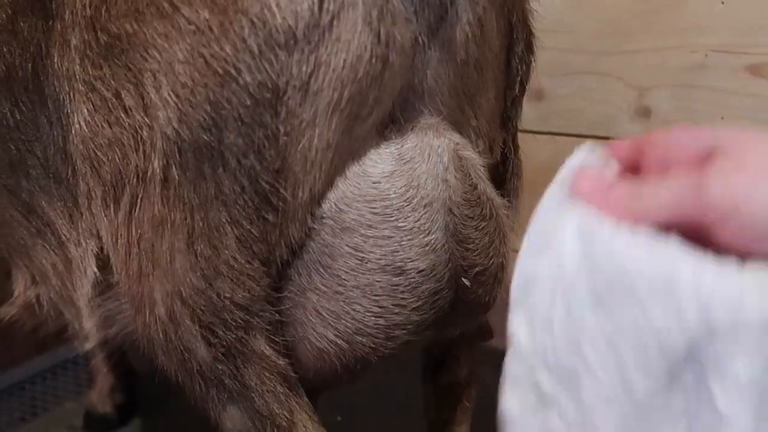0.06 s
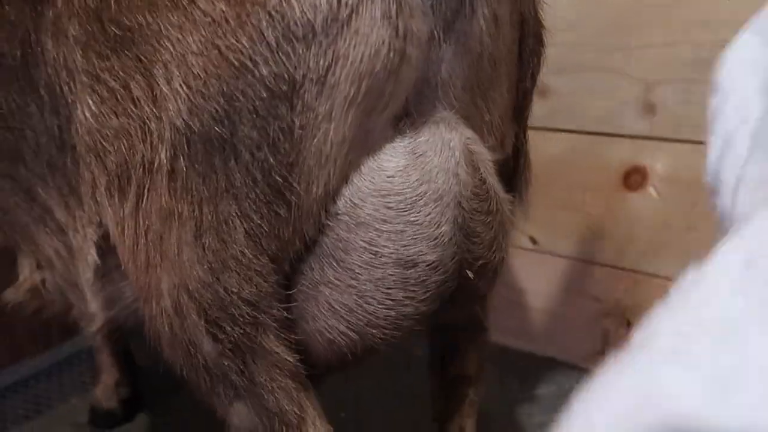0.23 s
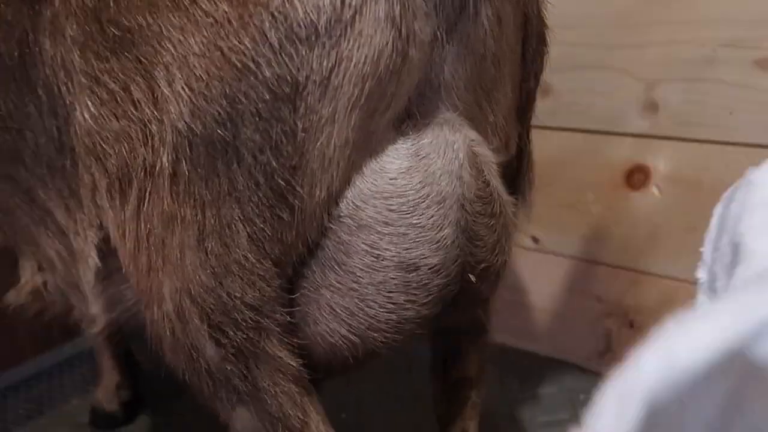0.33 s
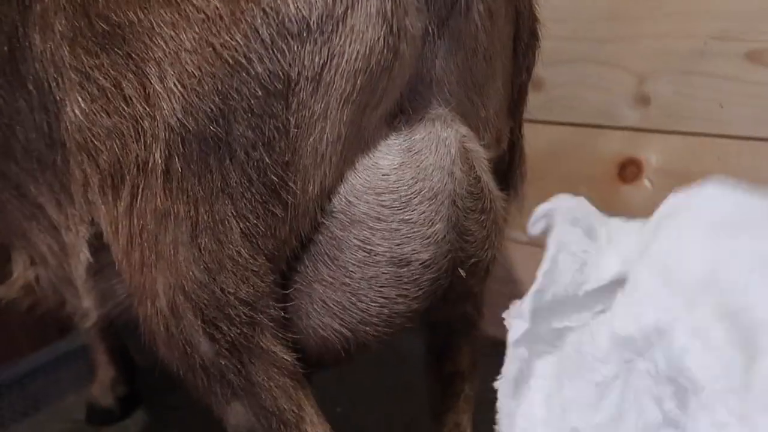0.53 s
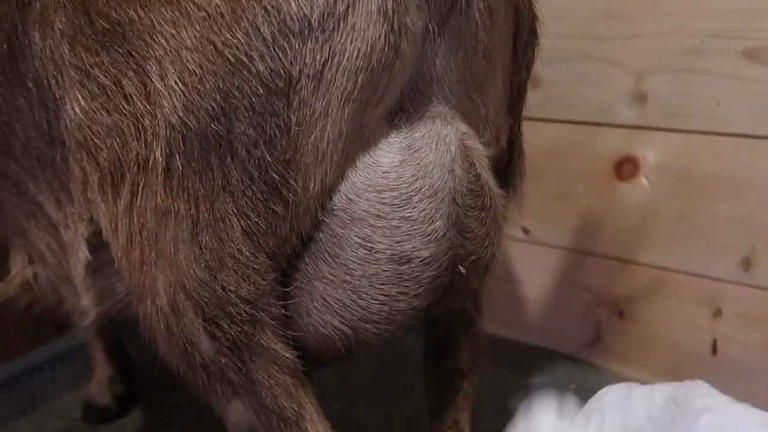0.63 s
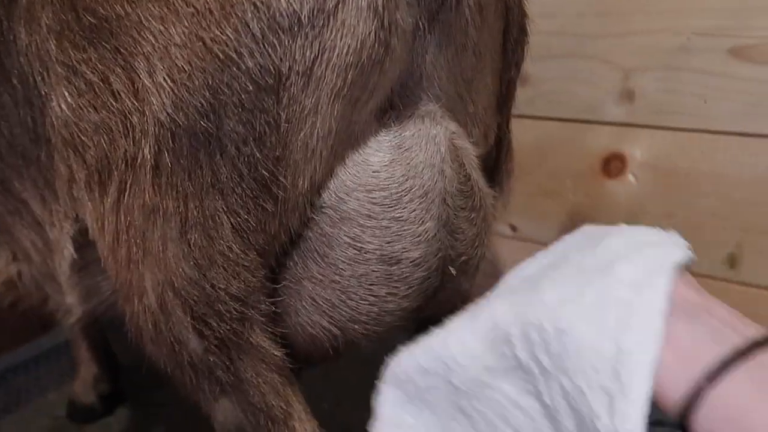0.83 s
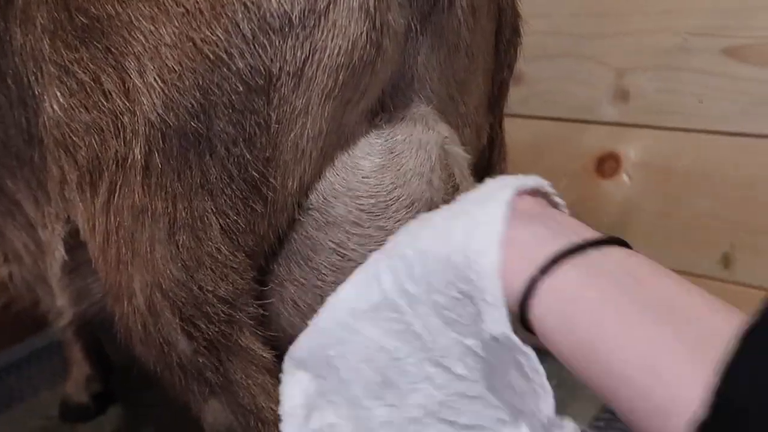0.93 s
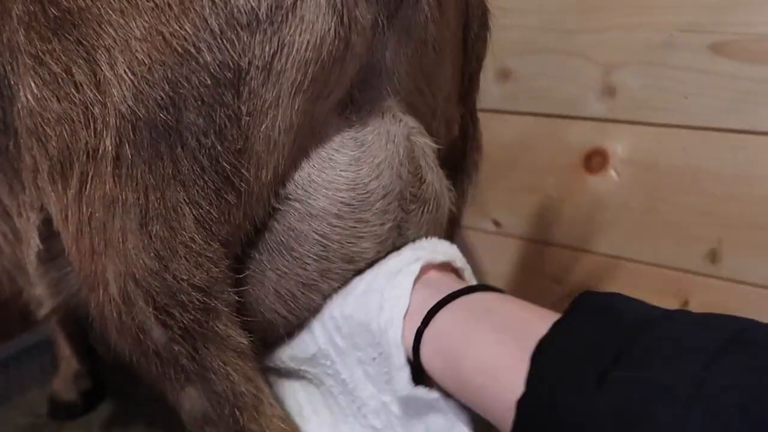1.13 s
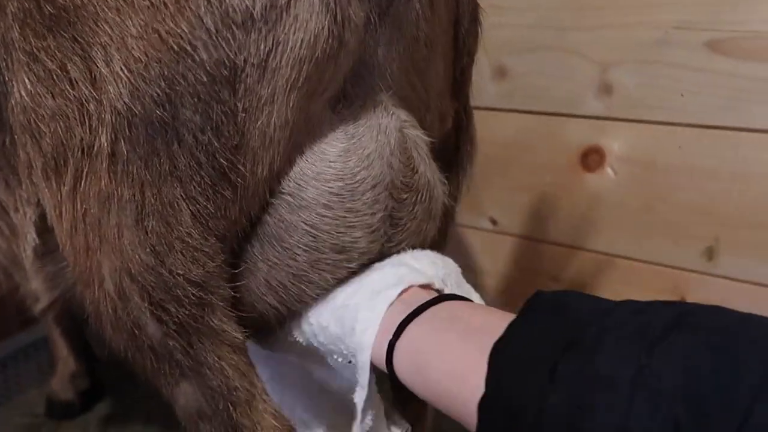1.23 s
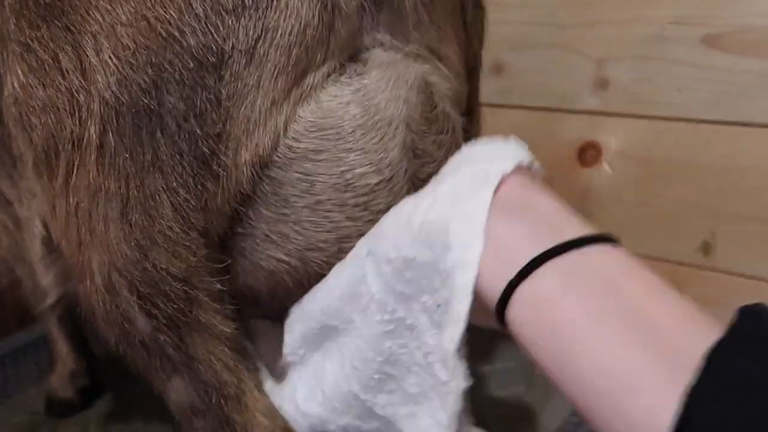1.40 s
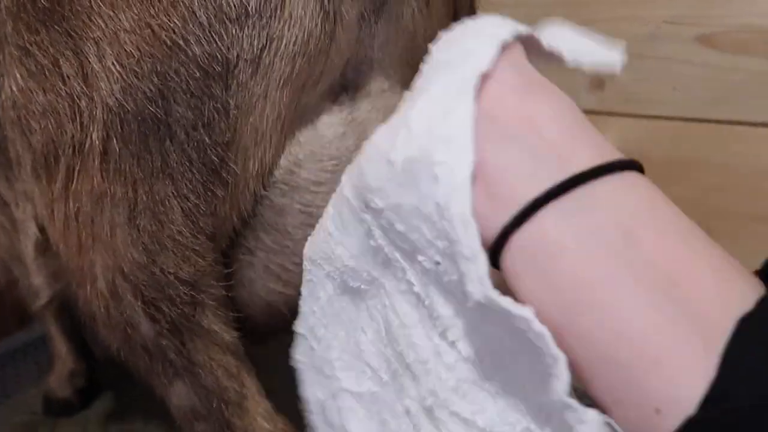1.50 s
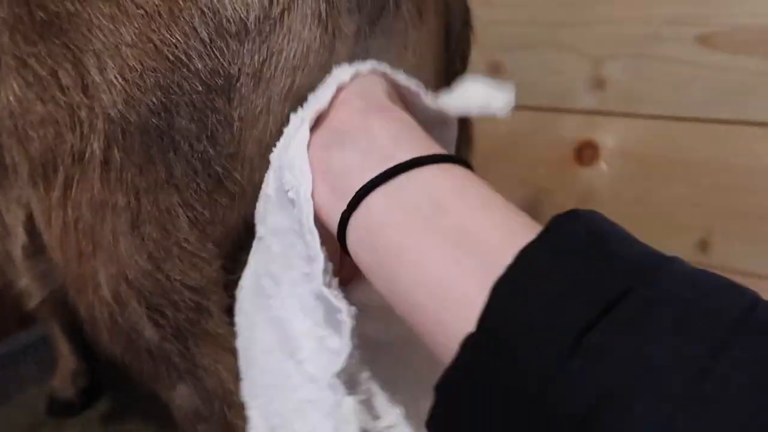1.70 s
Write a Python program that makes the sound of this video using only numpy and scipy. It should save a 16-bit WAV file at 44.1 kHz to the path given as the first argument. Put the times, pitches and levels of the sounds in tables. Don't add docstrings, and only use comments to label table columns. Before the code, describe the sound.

A low nasal goat bleat stutters, then a higher, brighter, longer one overlaps it in a small wooden barn; soft hoof knocks, light cloth swishes and tiny ticks close to the microphone, over faint rumble.

```python
import sys
import numpy as np
from scipy import signal
from scipy.fft import rfft, irfft, next_fast_len
from scipy.io import wavfile
from scipy.ndimage import uniform_filter1d

SR = 44100
rng = np.random.default_rng(int(sys.argv[2]) if len(sys.argv) > 2 else 0)


def persist_wave(psi):
    counts = np.round(np.clip(psi, -1, 1) * 32767).astype(np.int16)
    wavfile.write(sys.argv[1], SR, np.atleast_2d(counts).T)


def volts_from_db(level):
    exponent = np.asarray(level, float) / 20
    return 10 ** exponent


N = 77175
T = np.arange(N) / SR


# peak t/s, level/dB, starting pitch f/Hz, overtones relative level/dB
LOW_GOAT_THROBS = [
    (.214, -30.5, 260.5, -19.5),
    (.326, -27, 266.6, -10),
    (.432, -19.5, 280, -6.5),
    (.532, -19.5, 275.4, -5.5),
    (.63, -19, 272, -8.5),
    (.73, -23, 271.4, -4.5),
    (.83, -38.5, 256.2, 1),
]
# multiple of the pitch, level/dB
LOW_GOAT_HARMONICS = [(1, -1.5), (2, 1.5), (3, 2), (4, -17), (5, -43.5), (6, -14), (7, -32.5), (8, -22),
                      (9, -18.5), (10, -31), (11, -39), (12, -58.5), (13, -43), (14, -31)]


def low_goat():
    voice = bleat(LOW_GOAT_THROBS, LOW_GOAT_HARMONICS, rise_s=0.0361, hold_s=0.0031, fall_db_per_s=889,
                  sag=.08, lead_s=0.011, main=1, breath_db=-5, breath_hz=2130)
    return slap_echo(nose(voice))


# peak t/s, level/dB, starting pitch f/Hz,
# overtones relative level/dB
HIGH_GOAT_THROBS = [(.43, -33, 398.3, 3.5), (.47, -51.5, 398.6, 7.5), (.525, -28, 415.3, 8),
                    (.552, -23, 402, 3.5), (.585, -27, 408.5, -0.5), (.625, -13.5, 414.5, 0),
                    (.665, -24, 413.1, 5), (.718, -12.5, 415.3, -2), (.762, -24.5, 408.9, 5.5),
                    (.806, -13.5, 420.3, -4.5), (.835, -23, 407.5, 5), (.862, -30, 416.9, 7),
                    (.897, -14, 428.7, -6), (.918, -19.5, 424.1, 2.5), (.952, -21, 415.7, -3),
                    (.99, -19, 429.4, 2.5), (1.02, -16, 418.6, 1.5), (1.054, -29.5, 411.3, 2),
                    (1.098, -14, 415.2, -2), (1.132, -18.5, 409.7, -5.5), (1.155, -30.5, 399.9, 6),
                    (1.18, -28.5, 404.8, 1.5), (1.225, -49.5, 405.7, -2), (1.335, -43.5, 403, -9)]
# multiple of the pitch, level/dB
HIGH_GOAT_HARMONICS = [(1, -24), (2, -22), (3, -3), (4, -20.5), (5, -16), (6, -12), (7, -19.5), (8, -23.5),
                       (9, -19), (10, -16.5), (11, -18), (12, -23), (13, -33), (14, -40), (15, -37),
                       (16, -43.5), (17, -49), (18, -54.5), (19, -57), (20, -40)]


def high_goat():
    voice = bleat(HIGH_GOAT_THROBS, HIGH_GOAT_HARMONICS, rise_s=0.0165, hold_s=0.021, fall_db_per_s=633,
                  sag=.05, lead_s=-0.0035, main=3, breath_db=-17, breath_hz=4800)
    return slap_echo(voice)


def bleat(rows, harmonics, rise_s, hold_s, fall_db_per_s, sag, lead_s, main, breath_db, breath_hz):
    jitter, wobble_db = .004, 1.3
    rough_hz, rough_rad = 60, .25
    peak_s, db, hz, over_db = np.transpose(rows)
    start = peak_s - rise_s
    last = np.clip(np.searchsorted(start, T) - 1, 0, None)
    pitch = hz[last] * (1 - sag * np.clip((T - start[last]) / .09, 0, 1))
    pitch = uniform_filter1d(pitch, size=400) * (1 + jitter * drift(90))
    phase = 2 * np.pi * np.cumsum(pitch) / SR
    body = throbs(peak_s, db, rise_s, hold_s, fall_db_per_s)
    edge = throbs(peak_s - lead_s, db + over_db, rise_s, hold_s, fall_db_per_s)

    voice = np.zeros(N)
    for k, level_db in harmonics:
        envelope = edge if k > main else body
        wobble = wobble_db * (k != main) * np.log2(1 + k) * drift(25)
        roughness = rough_rad * np.sqrt(k - 1) * drift(rough_hz)
        angle = k * phase + rng.uniform(0, 2 * np.pi) + roughness
        voice += volts_from_db(4 + level_db + wobble) * envelope * np.sin(angle)

    air = bandpass(rng.standard_normal(N), breath_hz / 4, breath_hz)
    puffs = 1 + np.sin(phase)
    return voice + volts_from_db(breath_db) * edge * rms_one(air) * puffs


def throbs(times, dbs, rise_s, hold_s, fall_db_per_s):
    since = T - np.asarray(times)[:, None]
    swell = np.clip(1 + since / rise_s, 0, 1) ** 2
    decay_db = fall_db_per_s * np.clip(since - hold_s, 0, None)
    shape = swell * volts_from_db(np.asarray(dbs)[:, None] - decay_db)
    return np.sqrt(np.sum(shape ** 2, axis=0))


def nose(x):
    nose_hz, width_hz, nose_db = 256, 45, 6.5
    r = np.exp(-np.pi * width_hz / SR)
    poles = [1, -2 * r * np.cos(2 * np.pi * nose_hz / SR), r * r]
    ring = signal.lfilter([(1 - r * r) / 2, 0, (r * r - 1) / 2], poles, x)
    thinned = signal.sosfilt(signal.butter(4, 400, "high", fs=SR, output="sos"), x)
    return thinned + volts_from_db(nose_db) * ring


def slap_echo(x):
    echo_s, echo_db = .043, -8
    late = np.concatenate([np.zeros(int(echo_s * SR)), x])[:N]
    return x + volts_from_db(echo_db) * bandpass(late, 400, 6000)


# start t/s, length t/s, level/dB
CLOTH_STROKES = [
    (0.036, 0.04, -82),
    (0.215, .07, -55.5),
    (0.282, 0.12, -42.5),
    (1.375, 0.23, -40),
    (1.71, 0.059, -45.5),
]
# f/Hz, level/dB per Hz
CLOTH_SPECTRUM = [(410, -1), (700, -30), (957, -30.5), (1270, 4), (1380, -0.5), (3240, -4.5), (9220, -28.5),
                  (12000, -59), (20300, -120)]


def cloth():
    shape = np.zeros(N)
    for start, length, db in CLOTH_STROKES:
        arch = np.sin(np.pi * np.clip((T - start) / length, 0, 1))
        shape += volts_from_db(db) * arch ** .6
    return shape * banded_noise(CLOTH_SPECTRUM, patchy_db=-2.5, rate=15)


# t/s, peak level/dB, f/Hz
HOOF_KNOCKS = [
    (0.139, -30, 130),
    (0.21, -24.5, 185),
    (.535, -33.5, 61.9),
    (.8, -29, 172.5),
    (1.205, -40.5, 587),
]


def hooves():
    t60_s, onset_s = 0.27, 0.0014
    out = np.zeros(N)
    for start, db, hz in HOOF_KNOCKS:
        t = np.clip(T - start, 0, None)
        out += volts_from_db(db - 60 * t / t60_s) * (1 - np.exp(-t / onset_s)) * np.sin(2 * np.pi * hz * t)
    return out


# t/s, peak level/dB
TICK_TIMES = [
    (.066, -25.5),
    (.145, -36),
    (1.436, -21.5),
    (1.557, -32),
]


def ticks():
    tick_hz, t60_s = 2400, .004
    clicks = np.zeros(N) + 1e-18
    for start, db in TICK_TIMES:
        clicks[int(start * SR)] = volts_from_db(db)
    r, w = volts_from_db(-60 / (t60_s * SR)), 2 * np.pi * tick_hz / SR
    return signal.lfilter([0, np.sin(w)], [1, -2 * r * np.cos(w), r * r], clicks)


def barn(x):
    t60_s, wall_cut_hz = .42, 6000
    size = next_fast_len(N + 2 * SR)
    w = 2 * np.pi * np.arange(size // 2 + 1) / size
    spectrum = rfft(x, size)
    dull = 1 / np.sqrt(1 + (w * SR / (2 * np.pi * wall_cut_hz)) ** 2)
    out = []
    for lags in rng.uniform(.017, .06, (2, 10)):
        response = 0
        for k, lag in enumerate(lags):
            loss = volts_from_db(-60 * lag / t60_s) * dull ** (lag / .04)
            loop = loss * np.exp(-1j * w * round(lag * SR))
            response = response + (-1) ** k * loop / (1 - loop)
        out.append(irfft(spectrum * response, size)[:N] / 3)
    return out


# f/Hz, level/dB per Hz
RUMBLE_SPECTRUM = [(30, -29), (50, -10), (80, -8.5), (130, -0.5), (400, -8), (900, -15), (2500, -22),
                   (9300, -46)]


def rumble():
    return volts_from_db(-38.5) * banded_noise(RUMBLE_SPECTRUM, patchy_db=2.0, rate=1.4)


def fan():
    return volts_from_db(-47 + 3 * drift(4)) * np.sin(2 * np.pi * 58 * T + 1.5 * drift(3))


# f/Hz, level/dB per Hz
HISS_SPECTRUM = [(60, -8.5), (300, 6.5), (700, -0.5), (2000, -25.5), (4000, -4.5), (9000, -7.5),
                 (14000, -19), (15500, -30)]


def side_hiss():
    return volts_from_db(-53) * banded_noise(HISS_SPECTRUM, patchy_db=-1.0, rate=4)


def banded_noise(spectrum, patchy_db, rate):
    out, together = 0, drift(rate)
    edges = 22 * 2 ** np.arange(0, 9.6, .5)
    white = rng.standard_normal((2, N))
    hzs, dbs = np.transpose(spectrum)
    for k, (low, high) in enumerate(zip(edges, edges[1:])):
        band = bandpass(white[k % 2], low, high)
        centre = np.log(low * high) / 2
        db = np.interp(centre, np.log(hzs), dbs, left=dbs[0] - 20, right=dbs[-1] - 20)
        flicker = .6 * together + drift(3 * rate)
        out = out + band * volts_from_db(db + patchy_db * flicker)
    return rms_one(out)


def drift(rate):
    step = 20
    r = np.exp(-2 * np.pi * rate * step / SR)
    white = rng.standard_normal(N // step + 2002)
    slow = signal.lfilter([1], [1, -2 * r, r * r], white)[2000:]
    return np.interp(np.arange(N) / step, np.arange(len(slow)), rms_one(slow))


def bandpass(x, low_hz, high_hz, order=2):
    return signal.sosfilt(signal.butter(order, [low_hz, high_hz], "band", fs=SR, output="sos"), x)


def rms_one(x):
    return x / np.sqrt(np.mean(x ** 2) + 1e-20)


def scene():
    low, high = low_goat(), high_goat()
    wet, wide = barn(.5 * low + high)
    near = cloth() + ticks() + hooves()
    mid = low + high + volts_from_db(-9) * wet + near + fan() + rumble()
    mid = signal.sosfilt(signal.cheby2(6, 45, 10730, fs=SR, output="sos"), mid)

    lagged = np.roll(low + high, int(.006 * SR))
    skew = 0.45 * wide + .5 * lagged + 0.41 * cloth()
    treble = volts_from_db(5.5) * bandpass(skew, 5500, 8500, order=1)
    port = volts_from_db(-27) * bandpass(skew, 3800, 5200, order=1)
    side = treble + port + .05 * low + .045 * (high + .3 * wide) + side_hiss()
    return np.array([mid + side, mid - side])


def band_limit(x):
    return signal.sosfilt(signal.butter(12, 15200, fs=SR, output="sos"), x)


def record(dry):
    return band_limit(dry)


dry = scene()
out = record(dry)
persist_wave(out)
```